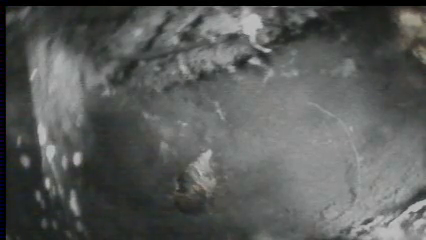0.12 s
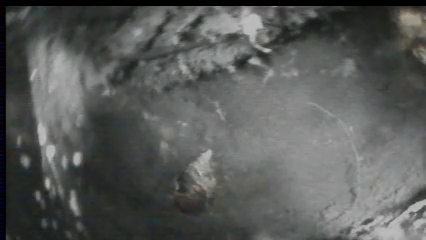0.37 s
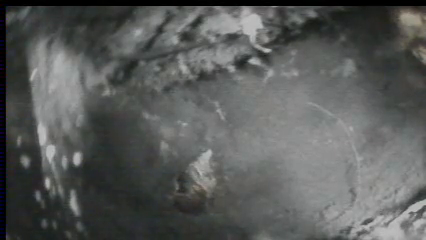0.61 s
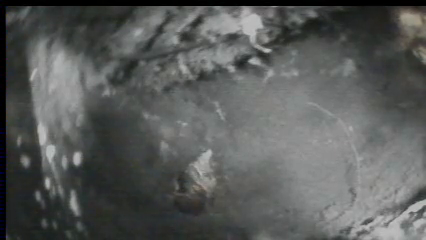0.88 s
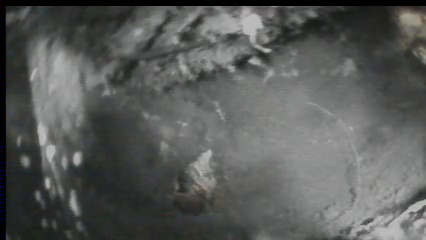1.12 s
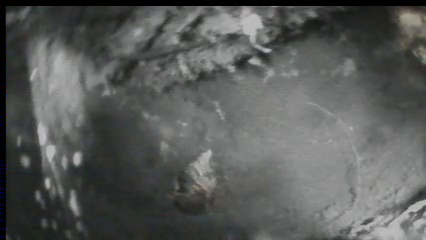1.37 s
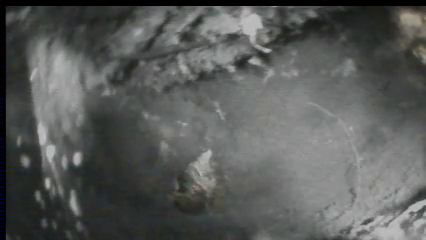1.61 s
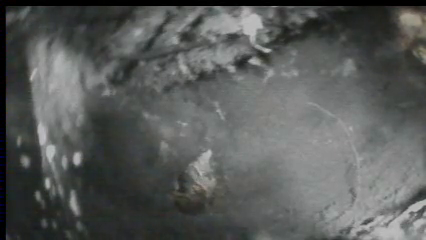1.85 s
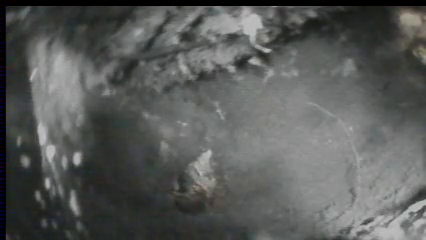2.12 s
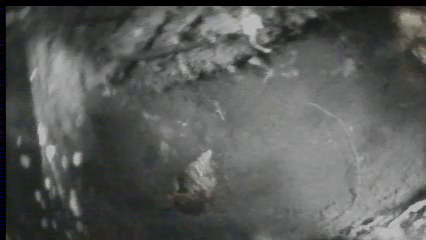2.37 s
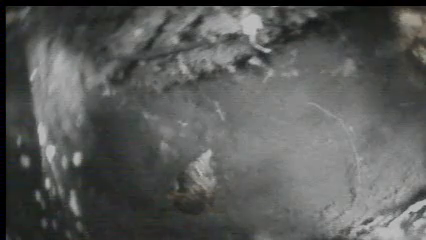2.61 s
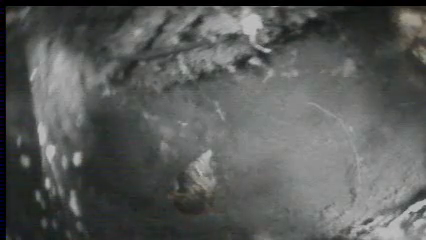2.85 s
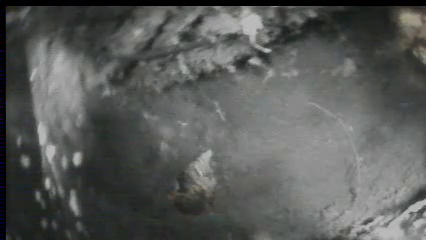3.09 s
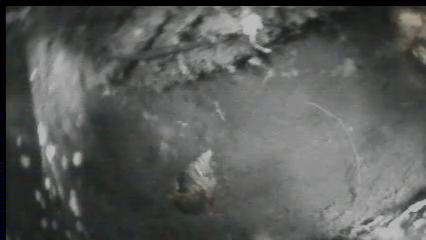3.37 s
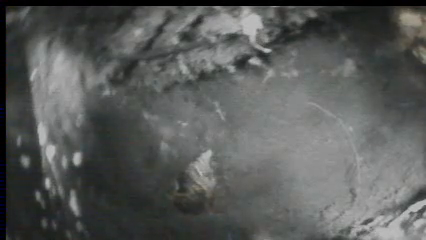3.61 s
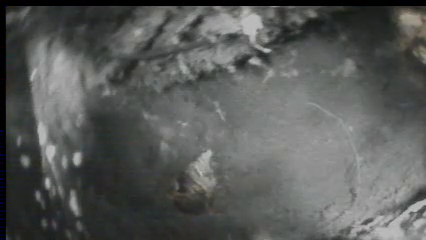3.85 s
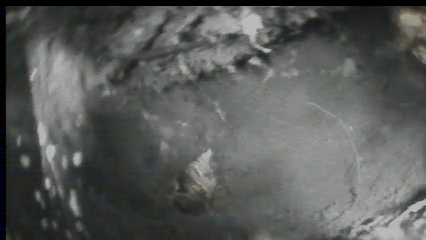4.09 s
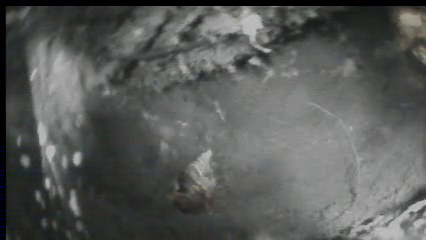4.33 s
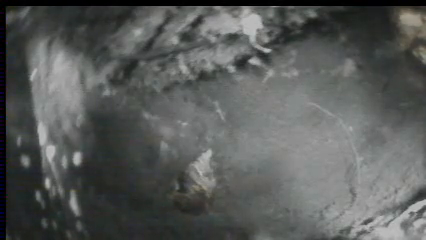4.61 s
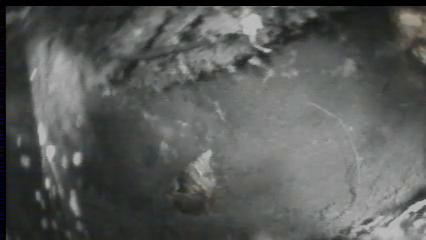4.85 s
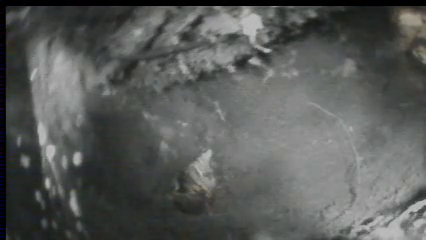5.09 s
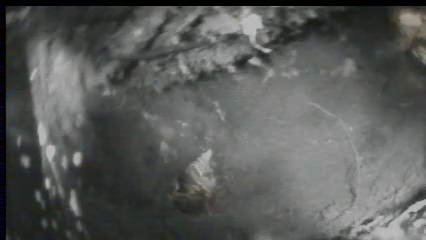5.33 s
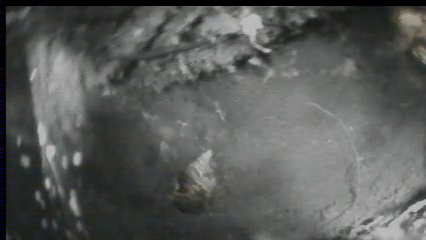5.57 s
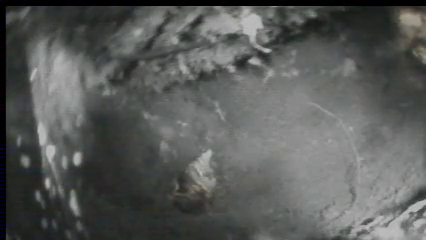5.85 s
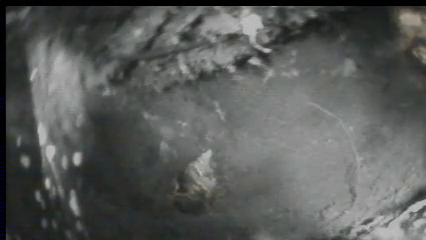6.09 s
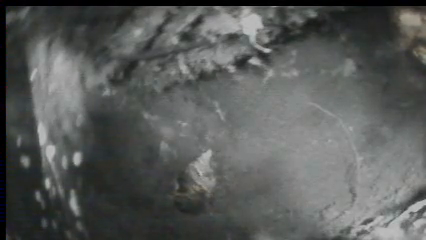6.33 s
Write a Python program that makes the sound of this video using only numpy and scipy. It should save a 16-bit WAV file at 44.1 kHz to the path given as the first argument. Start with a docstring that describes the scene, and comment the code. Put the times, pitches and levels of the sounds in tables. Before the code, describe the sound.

Near a nest hollow, the end of a high bird sweep is heard at once, with echoes. At 0.3 s the close bird whistles loudly, climbing then breaking off; a brief lower sweep from another perch follows at 0.65 s. A third bird starts quick falling chips at 0.85 s, repeating near 1.7, 2.4, 3.1, 4.05, 4.7 and 5.55 s, with tight wall slaps. The close bird whistles upward again at 0.95 s and gives a bright, very short sweep at 1.7 s. Thin, flat, slightly wavering notes last about a quarter to a third of a second from 2.25 and 3.9 s. Small dry clicks tick at 3.2 and around 5.4 s, the latter sharpest, and faintly at 5.9 s. Another loud sweep comes at 6.1 s. Faint blurred birds, surging low traffic rumble and soft air continue throughout, strongest early on, with dulled treble.

```python
"""Outside a nest hollow, at close range: a bird's sweep is already under way, then come its rising whistle
and a lower sweep from another perch; a third bird's short falling chips begin and go on, the close bird
whistles and sweeps again, and a fourth holds two long flat notes between chips; it ends on a close sweep.
The calls are near sines following drawn pitch and level; walls nearby return each as separate echoes.
Throughout, scattered tones make fainter birds, short clicks tick, and shaped noise is far traffic and air."""
import sys
import numpy as np
from scipy import signal
from scipy.fft import rfft, irfft
from scipy.io import wavfile
from scipy.ndimage import uniform_filter1d, minimum_filter1d

SR = 44100
rng = np.random.default_rng(int(sys.argv[2]) if len(sys.argv) > 2 else 0)


def inscribe(sig):
    """Save sig as 16-bit PCM at rate SR to the path in sys.argv[1].

    A 1-D sig is mono; a 2-D sig holds one channel per row.
    Samples are clipped to [-1, 1] before scaling.
    """
    pcm = np.round(np.clip(np.atleast_2d(sig).T, -1, 1) * 32767)
    wavfile.write(sys.argv[1], SR, pcm.astype(np.int16))


def gain_from_db(level_db):
    """Turn a decibel level (scalar or array-like) into a linear amplitude factor."""
    decades = np.asarray(level_db, float) / 20
    return 10 ** decades


N = 284445  # length in samples


def evened(x):
    """Scales to rms 1."""
    return x / np.sqrt(np.mean(abs(x) ** 2) + 1e-20)


def add(mix, s, sound):
    """Mixes a sound in at time s, in seconds."""
    part = mix[round(s * SR):][:len(sound)]
    part += sound[:len(part)]


def whistle(rows):
    """A near sine that follows its pitch and level, with a slight tremble; returns its start and sound."""
    s, hz, db = np.transpose(rows)
    t = np.arange(s[0], s[-1], 1 / SR)
    tremble = 1 + 0.044 * evened(uniform_filter1d(rng.standard_normal(len(t)), size=150))
    # opens within 0.8 ms, closes over 2.4 ms
    ramps = np.minimum(1, np.minimum(t - s[0] + 1 / SR, (s[-1] - t) / 3) / 0.0008)
    smooth_hz = uniform_filter1d(np.interp(t, s, hz), size=90, mode="nearest")
    turns = np.cumsum(smooth_hz) / SR
    loudness = np.interp(t, s, gain_from_db(db)) * tremble * ramps
    return s[0], np.sqrt(2) * loudness * np.sin(2 * np.pi * turns)


def sung(calls, shape):
    """Stretches one call shape to the time, pitch range and level of each call."""
    u, height, under_db = np.transpose(shape)
    return [np.transpose([s + length * u, low_hz + (top_hz - low_hz) * height, db + under_db])
            for s, length, low_hz, top_hz, db in calls]


def unit_energy(rows):
    """Scales each row to energy 1."""
    return rows / np.linalg.norm(rows, axis=1, keepdims=True)


def space(x, echoes, tail):
    """Direct sound, wall echoes (firm taps, or smears off rougher walls) and a dying tail of sparse taps.
    Moving air and leaves keep changing the scattered part: three versions of it take turns."""
    flutter_hz = 22  # how often the pace of the turns is drawn anew
    tail_db, t60 = tail
    t = np.arange(SR) / SR
    firm = np.zeros(SR)
    firm[0] = 1
    sparse = rng.standard_normal((3, SR)) * (rng.random((3, SR)) < 0.3)
    taps = sparse * gain_from_db(-60 * t / t60) * np.minimum(t / 0.017, 1)
    paths = gain_from_db(tail_db) * unit_energy(taps)
    for delay, db, smear in echoes:
        rough = rng.standard_normal((3, SR)) * np.exp(-abs(t - delay) / smear) * (t > delay)
        scattered = np.clip(smear / 0.007, 0, 0.98)
        paths += gain_from_db(db) * scattered * unit_energy(rough)
        firm[round(delay * SR)] += gain_from_db(db) * np.sqrt(1 - scattered ** 2)
    knots = np.arange(0, len(x) + SR, SR // flutter_hz)
    phase = np.interp(np.arange(len(x)), knots, np.cumsum(rng.random(len(knots))))
    # the squares of the three weights always sum to 1
    weights = np.sqrt(2 / 3) * np.cos(np.pi * (phase + np.arange(3)[:, None] / 3))
    wet = signal.fftconvolve(x[None], paths, axes=1)[:, :len(x)]
    return signal.oaconvolve(x, firm)[:len(x)] + (weights * wet).sum(0)


def bird(calls, echoes, tail):
    """All calls of one bird, heard from its perch; a call begun early still leaves its echoes."""
    lead_s = 0.1
    lead = round(lead_s * SR)
    voice = np.zeros(N + lead)
    for rows in calls:
        s, sound = whistle(rows)
        add(voice, s + lead_s, sound)
    return space(voice, echoes, tail)[lead:]


def rising_whistles():
    """The close bird's whistles: each climbs in pitch, then drops off abruptly."""
    # one table a note: t/s, f/Hz, level/dB
    rises = [
        [(.298, 5280, -26), (.304, 5194, -14), (.313, 5220, -13), (.329, 5360, -9.5), (.339, 5376, -9.5),
         (.353, 5520, -8.5), (.385, 5790, -9.5), (.393, 5804, -3), (.409, 5866, -3.5), (.428, 5844, -3),
         (.444, 5810, 0.5), (.449, 5520, -7.5), (.452, 5350, -7), (.4535, 5000, -15), (.456, 4550, -25.5)],
        [(.957, 5240, -26), (.963, 5160, -15.5), (.987, 5210, -12), (1.003, 5335, -11), (1.019, 5396, -9),
         (1.043, 5580, -7), (1.051, 5617, -6.5), (1.07, 5610, -7), (1.087, 5593, -4), (1.092, 5310, -6.5),
         (1.094, 5060, -15), (1.098, 4590, -24)],
    ]
    # wall echoes: delay/s, level/dB against the direct sound, smear/s
    rise_echoes = [(.02, -25, .01), (.043, -22.5, 0.011), (.08, -17, .006), (.098, -26, .015),
                   (.14, -26, .025), (.197, -21.5, .007)]
    return bird(rises, rise_echoes, tail=(-16, 0.85))  # tail: level/dB, t60/s


def close_sweeps():
    """The close bird's sweeps: one arch of pitch, up quickly and slowly down, stretched to each call."""
    # start/s, length/s, f/Hz at height 0, f/Hz at height 1, level/dB
    sweeps = [(-.042, .056, 4990, 5490, -11), (1.725, 0.068, 5117, 6068, -1),
              (6.089, 0.078, 5140, 6070, -3.5)]
    # the arch: share of the length, height in the pitch range, level/dB against the call's
    sweep_shape = [(0, 0.28, -28), (0.022, 0.66, -4), (0.063, 0.99, -0.5), (.18, 0.94, 1), (.35, .83, -5),
                   (0.489, .7, -4.5), (0.662, .42, -8.5), (.82, 0.1, -8.5), (.91, 0.012, -12),
                   (1, 0.25, -39.5)]
    # wall echoes: delay/s, level/dB against the direct sound, smear/s
    near_echoes = [(0.044, -20, 0.003), (.083, -19, 0.003), (0.098, -25, .008), (0.132, -25, .02),
                   (0.187, -23, .005), (.203, -22, 0.007)]
    return bird(sung(sweeps, sweep_shape), near_echoes, tail=(-16.5, 0.75))


def chips():
    """Short falling chips, each answered by the nearest wall, more or less as the head turns."""
    # start/s, length/s, f/Hz at height 0, f/Hz at height 1, level/dB, wall level/dB against the direct sound
    chip_calls = [(0.846, 0.028, 5450, 6455, -13, 6), (1.659, 0.03, 5470, 6193, -15.5, 3),
                  (2.428, 0.029, 5400, 6084, -14.5, 0.5), (3.11, 0.037, 5360, 5950, -16.5, 3),
                  (4.052, .038, 5280, 6000, -16, -2), (4.685, .035, 5320, 6275, -12, -3.5),
                  (5.559, .036, 5570, 5945, -12, -6.5)]
    # the fall: share of the length, height in the pitch range, level/dB against the call's
    chip_shape = [(0, .5, -26), (.08, .94, -5), (.2, 0.88, -2), (.42, 0.84, -1), (.62, 0.43, -1),
                  (.84, 0.0047, -9), (1, -0.44, -28)]
    # echoes off the other walls: delay/s, level/dB against the direct sound, smear/s
    chip_echoes = [(.017, -18, .004), (0.027, -12.5, 0.005), (.04, -17.5, 0.01), (.065, -22, 0.02)]
    wall_delay_s, wall_smear_s = 0.01147, 0.0004
    total = np.zeros(N)
    for *call, wall_db in chip_calls:
        echoes = [(wall_delay_s, wall_db, wall_smear_s)] + chip_echoes
        total += bird(sung([call], chip_shape), echoes, tail=(-12, 0.5))
    return total


def long_notes():
    """Long flat notes, their pitch wavering about one height, with a long tail."""
    # one table a note: t/s, f/Hz, level/dB
    flat_notes = [
        [(2.258, 5470, -37), (2.263, 5276, -16.5), (2.272, 5260, -19.5), (2.282, 5350, -23),
         (2.292, 5237, -18.5), (2.314, 5246, -13.5), (2.336, 5327, -14.5), (2.346, 5274, -11.5),
         (2.355, 5236, -16), (2.373, 5290, -11.5), (2.388, 5260, -15), (2.409, 5356, -14), (2.427, 5268, -15),
         (2.45, 5320, -12.5), (2.478, 5355, -17), (2.496, 5430, -13.5), (2.525, 5440, -14.5),
         (2.54, 5432, -11.5), (2.562, 5356, -14), (2.569, 5190, -18.5), (2.576, 5050, -32.5)],
        [(3.885, 5280, -35.5), (3.888, 5484, -14), (3.893, 5510, -12.5), (3.911, 5397, -12.5),
         (3.933, 5253, -13), (3.957, 5270, -13), (3.972, 5230, -15), (3.99, 5256, -13.5), (4.029, 5242, -18),
         (4.04, 5266, -16.5), (4.057, 5245, -17), (4.087, 5302, -18), (4.111, 5280, -17.5),
         (4.125, 5180, -21.5), (4.133, 5120, -24), (4.139, 5100, -35.5)],
    ]
    # wall echoes: delay/s, level/dB against the direct sound, smear/s
    long_echoes = [(0.021, -25, .01), (0.059, -15.5, 0.023), (.105, -19.5, .025), (.15, -18, .02),
                   (.2, -23, 0.033)]
    return bird(flat_notes, long_echoes, tail=(-15, 0.95))


def low_sweep():
    """One brief lower sweep from a fourth perch, with soft echoes."""
    # t/s, f/Hz, level/dB
    low_note = [(.633, 5180, -30.5), (.636, 5190, -13.5), (.64, 5236, -6.5), (.647, 5165, -8),
                (.654, 5020, -14), (.658, 4930, -20), (.669, 4950, -33)]
    # wall echoes: delay/s, level/dB against the direct sound, smear/s
    soft_echoes = [(.012, -22, 0.0025), (.033, -26, 0.0055), (.185, -21, 0.012)]
    return bird([low_note], soft_echoes, tail=(-20, 0.64))


def ticks():
    """Dry clicks of a few cycles under a bell-shaped envelope, with quick repeats off the walls."""
    # t/s, peak level/dB of the direct click, f/Hz
    clicks = [(3.175, -19, 5660), (5.389, -21.5, 6800), (5.438, -6.5, 5830), (5.897, -27, 5160)]
    # wall repeats: delay/s, level/dB against the direct sound, smear/s
    tick_echoes = [(.003, -7, .0004), (.006, -3.5, 0.00035), (0.015, -6.5, 0.0018), (0.024, -14.5, .001)]
    out, t = np.zeros(N), np.arange(-60, 60) / SR
    for s, db, hz in clicks:
        envelope = np.exp(-(t / 0.00023) ** 2)
        add(out, s - 30 / SR, gain_from_db(db) * envelope * np.cos(2 * np.pi * hz * t))
    return space(out, tick_echoes, tail=(-2, 0.15))


def chatter():
    """A dozen faint calls at random times and pitches, most of them falling a little."""
    count, length_s, pitch_hz, level_db = 12, (0.031, 0.16), (3300, 6840), (-49.5, -42)
    when, length, pitch, glide, level = rng.random((count, 5)).T
    hz = np.interp(pitch, [0, 1], pitch_hz)
    return np.transpose([when * (N / SR - 0.2), np.interp(length, [0, 1], length_s),
                         hz, hz * (0.93 + 0.11 * glide), np.interp(level, [0, 1], level_db)])


def steady(table):
    """Turns rows of one pitch into glides that stay on it."""
    return [(s, length, hz, hz, db) for s, length, hz, db in table]


def far_sounds():
    """Faint tones and puffs behind the close birds: glides whose strength and phase are randomly scattered."""
    # far birds whose glide can still be followed: start/s, length/s, first f/Hz, last f/Hz, level/dB
    far_calls = [(.146, 0.012, 2755, 2500, -32), (1.735, 0.1, 4460, 4380, -33),
                 (1.82, .11, 4400, 4380, -40), (1.9, .1, 4400, 4340, -28.5),
                 (3.795, 0.037, 1778, 1705, -38), (5.05, 0.028, 1517, 1520, -39),
                 (5.54, 0.015, 6234, 6250, -32), (5.69, 0.048, 6020, 5800, -31.5),
                 (5.724, .048, 5870, 4040, -32), (5.67, 0.019, 2590, 2770, -34),
                 (5.712, 0.025, 2285, 2290, -39), (.185, .07, 3300, 4030, -39.5),
                 (6.017, 0.026, 2242, 2250, -38), (6.085, 0.089, 4050, 4020, -38),
                 (6.208, 0.031, 6240, 6800, -32), (6.222, 0.13, 6744, 6510, -28.5)]
    # far glides, grainy and broken, and two late echoes of the opening close sweep:
    # start/s, length/s, first f/Hz, last f/Hz, level/dB
    grainy_calls = [(4.82, 0.054, 4380, 8300, -41), (4.85, .045, 4570, 5200, -37),
                    (4.996, 0.045, 5700, 3800, -40), (5.045, 0.07, 4535, 4490, -33),
                    (5.115, .125, 4490, 4490, -39.5), (5.62, .07, 5900, 6300, -37.5),
                    (5.79, 0.1, 5900, 5900, -39.5), (5.753, .047, 5900, 4350, -31),
                    (5.59, .026, 5200, 4350, -38), (2.685, .065, 3600, 3650, -42.5),
                    (3.5, 0.014, 5700, 5700, -37), (3.09, 0.014, 4880, 5600, -33.5),
                    (6.385, .04, 5600, 4210, -37.5), (6.352, .03, 6150, 5000, -33.5),
                    (6.376, .018, 4700, 4000, -32.5), (.05, 0.023, 5500, 5350, -32),
                    (.153, .03, 5500, 5400, -31)]
    # broad puffs of noise, blurred far calls and a low gust in the wash:
    # start/s, length/s, centre f/Hz, level/dB
    puffs = [(.0, 0.095, 6010, -47.5), (.22, .14, 3850, -36), (3.93, 0.064, 4100, -45),
             (4.15, 0.27, 4530, -46), (4.39, 0.076, 5830, -43), (.253, .107, 2245, -39.5),
             (.48, .45, 1250, -41.5), (1.31, 0.041, 2197, -39), (5.0, 0.067, 4990, -40.5),
             (1.41, 0.0074, 4030, -38), (1.992, .304, 2553, -40.5), (2.284, 0.048, 3600, -33.5),
             (2.386, 0.034, 4390, -36), (3.091, 0.065, 2222, -38), (3.167, 0.036, 6670, -37),
             (3.208, 0.014, 4915, -35.5), (3.252, 0.0085, 4785, -36), (4.344, .1, 2285, -40),
             (4.638, 0.094, 5100, -36), (4.717, .214, 6140, -40.5), (4.785, 0.038, 4470, -39),
             (4.86, .06, 5930, -46.5), (5.317, 0.034, 4210, -39.5), (5.665, 0.08, 2400, -41),
             (5.63, 0.04, 4310, -37.5), (2.922, .03, 4630, -46), (3.17, .06, 4980, -39),
             (6.282, .014, 4600, -38.5), (4.466, 0.027, 6040, -43), (5.75, 0.11, 5330, -39)]
    # soft swells of a narrow band in the low wash: start/s, length/s, centre f/Hz, level/dB
    drones = [(3.5, 0.33, 240, -39), (1.783, 0.072, 378, -34.5), (1.945, 0.041, 281.5, -31),
              (3.24, 0.11, 798, -43), (3.55, .09, 831, -37.5), (4.454, .146, 783, -41),
              (5.08, 0.27, 780, -41.5), (5.261, .19, 546, -38.5), (5.507, 0.13, 790, -38),
              (5.66, .08, 1268, -44), (5.76, .12, 1304, -42.5)]
    fall_fade_db = 14  # a glide weakens by this much for each octave that it falls
    voices = np.zeros(N)
    scatter = rng.standard_normal(N) + 1j * rng.standard_normal(N)
    # each kind with its blur in Hz: the wider, the noisier the tone
    for table, blur_hz in [(far_calls, 90), (grainy_calls, 230), (steady(puffs), 690),
                           (steady(drones), 159), (chatter(), 398)]:
        r = np.exp(-np.pi * blur_hz / SR)
        smooth = evened(signal.lfilter([1], np.convolve([1, -r], [1, -r]), scatter))
        for start, length, first_hz, last_hz, db in table:
            u = np.linspace(0, 1, round(length * SR))
            turns = np.cumsum(first_hz + (last_hz - first_hz) * u ** 1.4) / SR
            # the sharper the call, the more direct sound
            scattered = evened(smooth[round(start * SR):][:len(u)])
            wobble = evened(40 / blur_hz + scattered)
            tone = (wobble * np.exp(2j * np.pi * turns)).real
            fade_db = fall_fade_db * min(np.log2(last_hz / first_hz), 0) * u
            envelope = np.sqrt(2) * gain_from_db(db + fade_db) * signal.windows.tukey(len(u), 0.4)
            add(voices, start, envelope * tone)
    return space(voices, [], tail=(-5, 0.4))


def rumble():
    """The bottom of the distant traffic: noise narrowed to a peak, surging now and then."""
    # surges: t/s, half width/s, level/dB
    surges = [(.25, 0.15, -35.5), (0.948, 0.11, -36.5), (1.25, 0.073, -38.5), (2.301, 0.14, -40.5),
              (2.6, .1, -42.5), (3.2, 0.27, -46.5), (3.7, 0.19, -37), (4.2, 0.085, -41.5), (4.5, .1, -44),
              (5.1, 0.28, -46), (6.09, 0.055, -32)]
    peak_hz, width_hz, steady_db = 69.5, 20, -47
    off_peak = (np.fft.rfftfreq(N, 1 / SR) - peak_hz) / width_hz
    narrow = irfft(rfft(rng.standard_normal(N)) / (1 + off_peak ** 2), N)
    t = np.arange(N) / SR
    strength = gain_from_db(steady_db) + sum(gain_from_db(db) * np.exp(-((t - s) / width) ** 2) for s, width, db in surges)
    return strength * evened(narrow)


def wash():
    """Distant traffic and air: random short-time spectra with drifting patches, in low, middle and air layers."""
    # colour before the layers are levelled: f/Hz, relative level/dB
    wash_colour = [(20, -46), (90, -2), (230, -3.5), (400, -8.5), (790, -13), (1450, -20), (2750, -18),
                   (3100, -21), (3550, -18), (4570, -20.5), (5700, -19), (7100, -19), (7600, -37.5)]
    # loudness of the traffic: t/s, level/dB
    swell = [(0.0, -30), (0.47, -32.5), (0.75, -31.5), (1.52, -35.5), (1.9, -36), (2.3, -33), (2.44, -37.5),
             (3.75, -37), (4.15, -37), (5.15, -37.5), (5.43, -35.5), (5.95, -38), (6.45, -36.5)]
    # low, middle, air: level/dB when the swell is at its mean, dB for each dB of swell
    layer_levels = [(-38.5, 0.47), (-40.5, 0.99), (-45.5, -0.6)]
    mean_db = -36
    frames, hz = N // 256 + 5, np.fft.rfftfreq(1024, 1 / SR)
    a, b, patches = rng.standard_normal((frames, 513, 3)).T
    patches = evened(uniform_filter1d(uniform_filter1d(patches, size=7, axis=0), size=24, axis=1))
    f, db = np.transpose(wash_colour)
    colour_db = np.interp(np.log(hz + 1), np.log(f + 1), db)[:, None]
    patch_db = np.interp(hz, [300, 5000], [2.2, 3.8])[:, None] * patches
    z = (a + 1j * b) * gain_from_db(colour_db + patch_db)
    # the layers meet at about 600 and 1500 Hz
    over_low = 1 / (1 + (600 / (hz + 1)) ** 6)
    air = 1 / (1 + (1500 / (hz + 1)) ** 6)
    shares = np.sqrt([1 - over_low, over_low - air, air])
    swell_db = np.interp(np.arange(N) / SR, *np.transpose(swell)) - mean_db
    total = np.zeros(N)
    for share, (layer_db, follow) in zip(shares, layer_levels):
        layer = signal.istft(z * share[:, None], nperseg=1024, noverlap=768)[1][:N]
        total += gain_from_db(layer_db + follow * swell_db) * evened(layer)
    return total


def scene():
    """Four birds close by, then ticks, the far sounds, and the traffic and air behind."""
    close_bird = rising_whistles() + close_sweeps()
    other_birds = chips() + long_notes() + low_sweep()
    background = ticks() + far_sounds() + rumble() + wash()
    return (close_bird + other_birds + background)[None]


def drop_masked(x):
    """Faint bands that lie far under a louder band, above all over it in pitch, are dropped; the cover lingers."""
    hz, t, z = signal.stft(x, SR, nperseg=1024, noverlap=768)
    power = uniform_filter1d(uniform_filter1d(abs(z) ** 2, size=5, axis=0), size=5, axis=1)
    level_db = 10 * np.log10(abs(power) + 1e-14)
    held_db = np.maximum.accumulate(level_db + 70 * t, axis=1) - 70 * t  # sinks by 70 dB a second
    # how fast the cover thins with distance in Hz
    up_db, down_db = 0.0039 * hz[:, None], 0.006 * hz[:, None]
    from_below = np.maximum.accumulate(held_db + up_db, axis=0) - up_db
    from_above = np.maximum.accumulate((level_db - down_db)[::-1], axis=0)[::-1] + down_db
    treble_db = 0.0028 * np.maximum(hz[:, None] - 5700, 0)  # the top of the band goes first
    cover_db = np.maximum(from_below + treble_db, from_above + 2)
    margin_db = level_db - cover_db + 42.5
    keep = 1 / (1 + np.exp(-np.clip(margin_db / 0.85, -30, 30)))
    return signal.istft(z * keep, SR, nperseg=1024, noverlap=768)[1][:N]


def top_cut(x):
    """Nothing passes above the cut-off."""
    return signal.sosfilt(signal.butter(12, 7080, fs=SR, output="sos"), x)


def record(dry):
    """Masked bands are dropped and the treble is cut; a fast limiter holds the loudest calls near full scale."""
    low_pass = signal.firwin(201, 7300, window=("kaiser", 8), fs=SR)  # edge in Hz
    narrow = signal.oaconvolve(drop_masked(dry[0]), low_pass, "same")
    peak = -minimum_filter1d(-abs(narrow), size=240)
    limited = narrow / uniform_filter1d(np.maximum(peak / 0.97, 1), size=200)
    return top_cut(limited[None])


dry = scene()
out = record(dry)
inscribe(out)
```